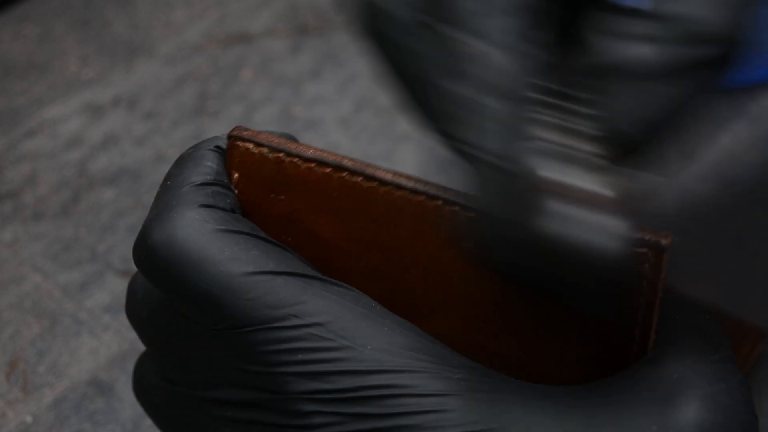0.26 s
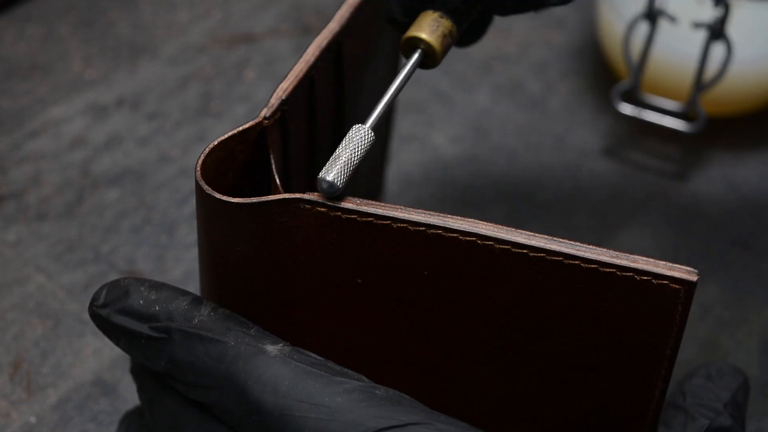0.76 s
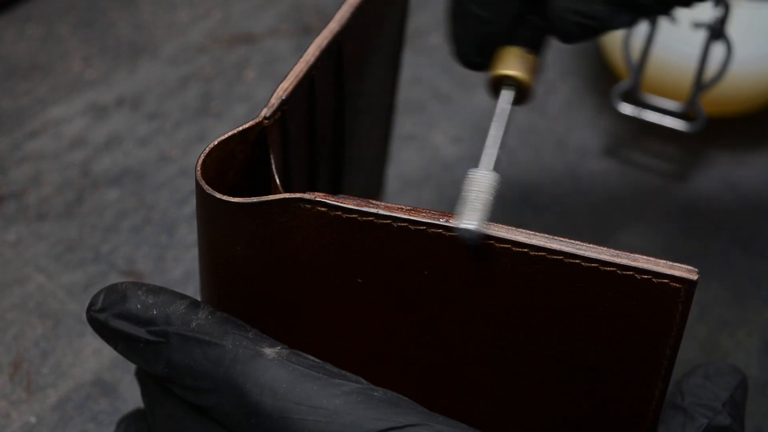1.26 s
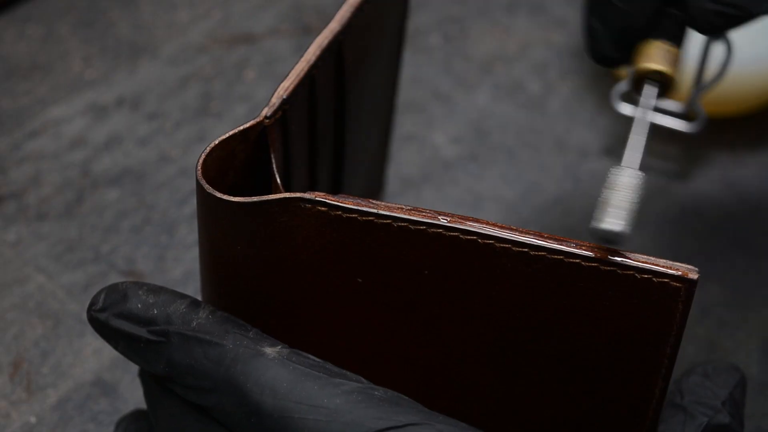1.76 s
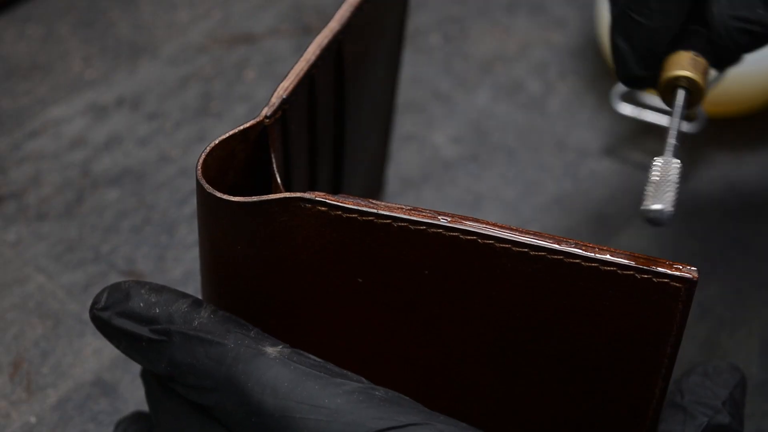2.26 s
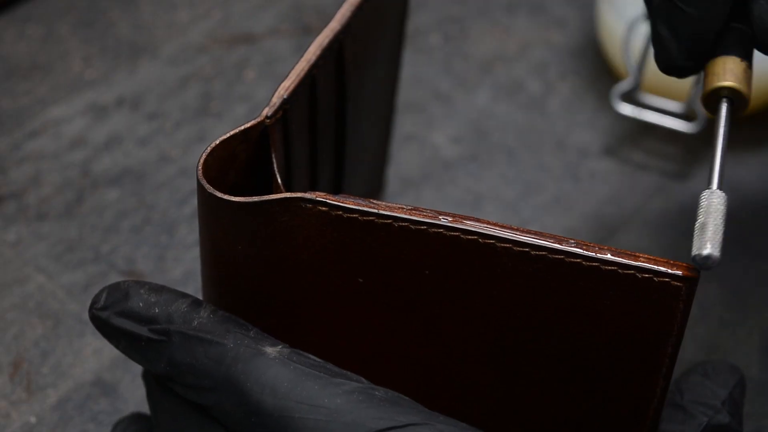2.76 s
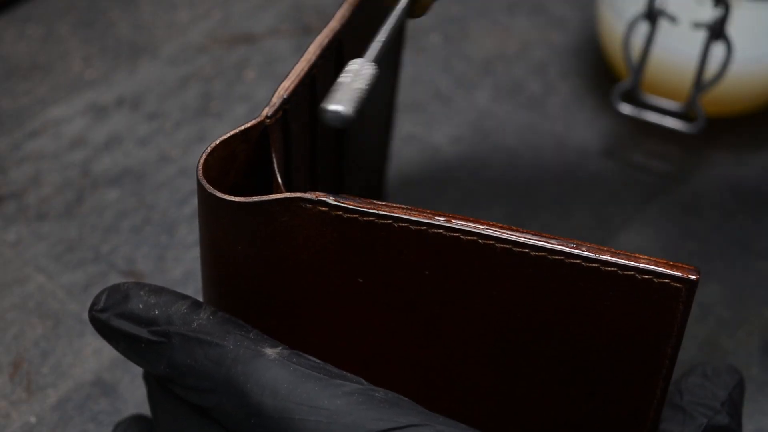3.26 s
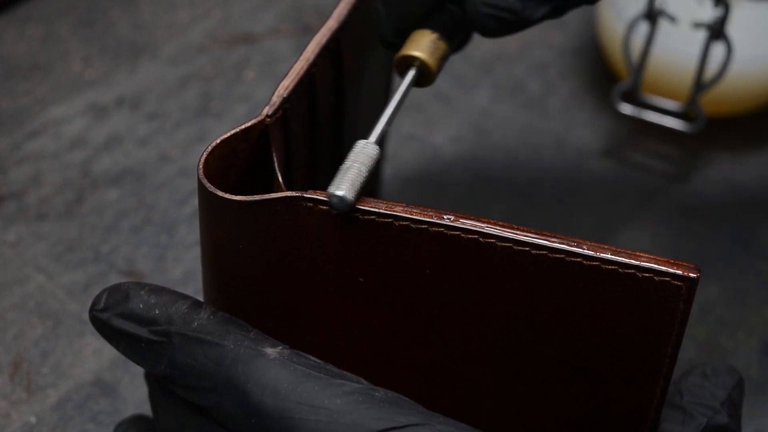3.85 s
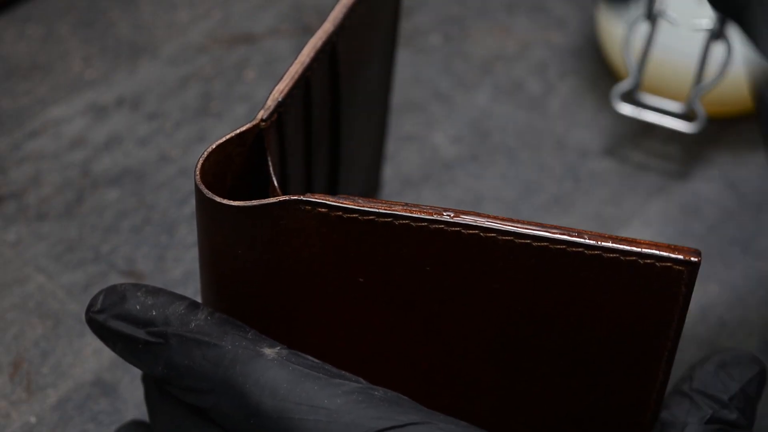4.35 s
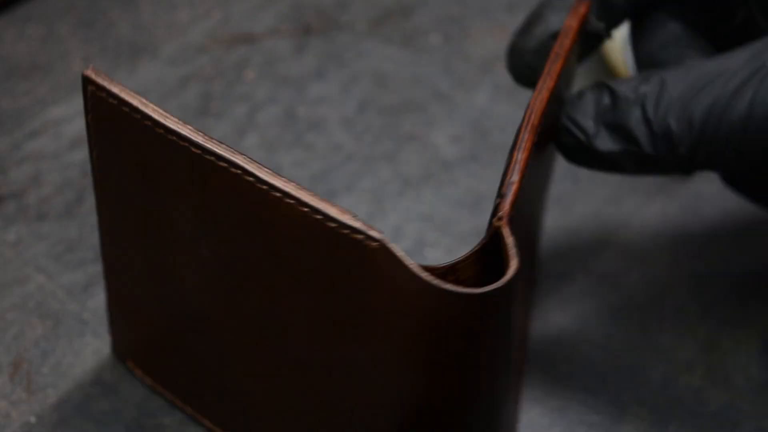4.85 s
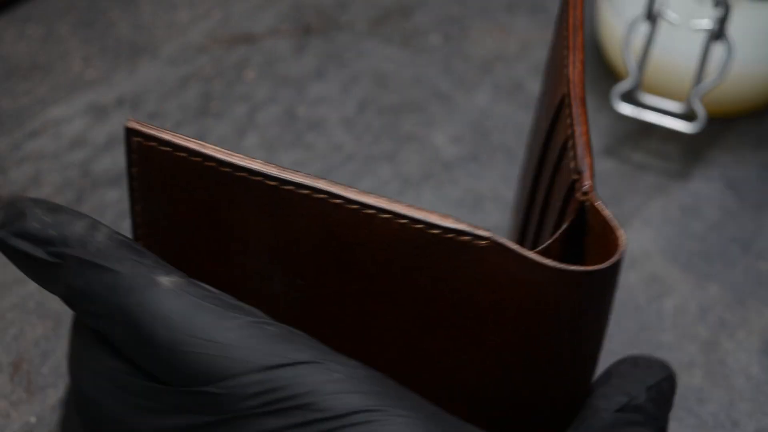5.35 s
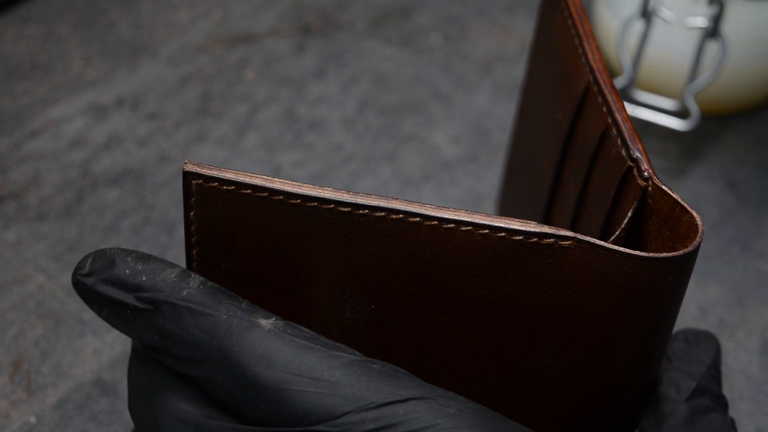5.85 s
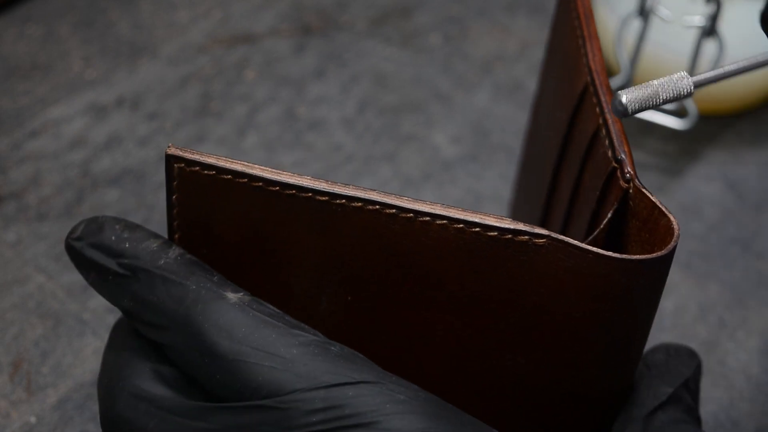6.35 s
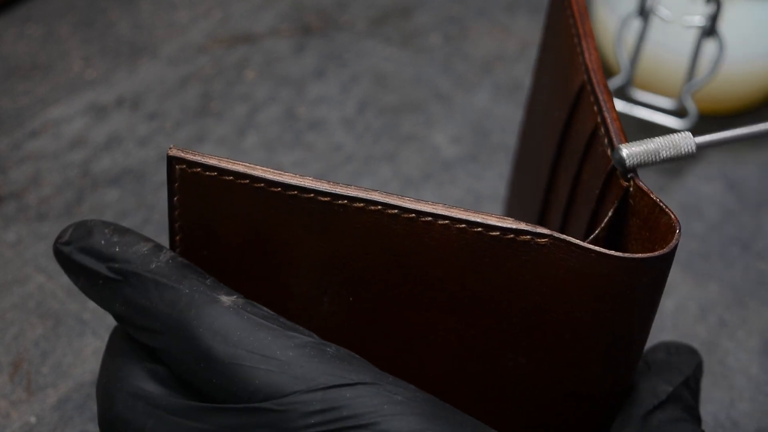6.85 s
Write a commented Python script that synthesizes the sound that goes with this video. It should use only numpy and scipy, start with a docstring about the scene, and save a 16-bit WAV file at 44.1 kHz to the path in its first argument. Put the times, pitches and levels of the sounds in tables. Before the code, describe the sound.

A close stereo microphone in a small, quiet workshop hears brisk scratchy burnishing with little chirping catches, then near silence. Irregular light dabs knock and tick on leather, some with a low soft boom from the bench. Gloves brush and crinkle as the wallet slides round. Two hard steel clicks ring briefly, a tenth of a second apart, before faint handling and low room noise.

```python
"""Finishing the edge of a leather wallet

Gloved hands work at a bench: a wooden burnisher scrubs to and fro, then a metal applicator dabs along the edge.
The wallet slides and bumps on the bench, and a steel tool clinks twice. Rubbing is random slips through resonances;
blows are bursts of scattered noise, and the bench booms in fading sine waves. Sound arrives mostly by reflection,
so left and right get separate noise."""
import sys
import numpy as np
from scipy import signal
from scipy.fft import rfft, irfft, next_fast_len
from scipy.io import wavfile

SR = 44100
rng = np.random.default_rng(int(sys.argv[2]) if len(sys.argv) > 2 else 0)


def master_out(mix):
    """Clip the mix to full scale and print it as 16-bit PCM to the path in sys.argv[1]."""
    frames = np.transpose(np.atleast_2d(mix))
    ceiling = np.clip(frames, -1, 1)
    pcm = np.round(ceiling * 32767).astype(np.int16)
    wavfile.write(sys.argv[1], SR, pcm)


N = 312669   # length of the scene in samples
BLOW_SIZE, LEAD_SIZE = 16384, 1024   # samples in one blow, and those ahead of its moment of contact
LIFT_OFF_S, LIFT_FADE_S = .732, .014   # the burnisher is at work from the start until it lifts off

# How strong the hiss of leather fibres is from low to high. Each row: frequency in Hz, level in dB per Hz.
FIBRES = [(300, -3.5), (1500, 0.5), (3200, 6), (5000, 2), (7000, 1), (9000, -1), (11500, -1.5),
          (13500, -8.5), (16000, -25)]


def from_db(db):
    """Turn decibels into a gain."""
    return 10 ** (np.asarray(db) / 20)


def rms_one(x):
    """Scale each channel to an average strength (rms) of 1."""
    return x / np.sqrt(np.mean(x ** 2, axis=-1, keepdims=True) + 1e-20)


def pan(db):
    """Gains that make the left louder than the right by this many dB."""
    return from_db(np.array([[db], [-db]]) / 2)


def colour(x, spectrum):
    """Give a sound a smooth balance of low and high, at rms 1."""
    hz, db = np.transpose(spectrum)
    size = next_fast_len(x.shape[-1])
    f = np.maximum(np.arange(size // 2 + 1) * SR / size, 1)
    gain = from_db(np.interp(np.log(f), np.log(hz), db))
    shaped = irfft(rfft(x, size) * gain, size)
    return rms_one(shaped[:, :x.shape[-1]])


def resonate(x, modes):
    """Pass a sound through resonances side by side, each at its own level."""
    out = 0
    for hz, width, db in modes:
        r = np.exp(-np.pi * abs(width) / SR)   # a narrow resonance rings longer
        feedback = [1, -2 * r * np.cos(2 * np.pi * hz / SR), r * r]
        out = out + from_db(db) * rms_one(signal.lfilter([1, 0, -1], feedback, x))
    return out


def ring(x, modes):
    """Clear resonances with dark valleys between them: each is passed twice."""
    return sum(resonate(resonate(x, [(hz, width, 0)]), [(hz, width, db)]) for hz, width, db in modes)


def tilt(modes, slope_db):
    """A harder contact favours the high resonances, by slope_db an octave around 7000 Hz."""
    return [(hz, width, db + slope_db * np.log2(hz / 7000)) for hz, width, db in modes]


def soften(x, hz):
    """A soft surface swallows the treble above hz."""
    low_pass = signal.butter(2, min(hz, SR / 2 - 1), fs=SR, output="sos")
    return signal.sosfilt(low_pass, x)


def waver(per_s, spread_db):
    """A gain that wanders at random, towards a new value per_s times a second."""
    steps = rng.standard_normal(4096)
    position = np.arange(N) / SR * per_s
    return from_db(spread_db * np.interp(position, np.arange(len(steps)), steps))


def shifting(x, modes, per_s, spread_db):
    """As the contact point moves, each resonance is driven now more, now less."""
    out = 0
    for hz, width, db in modes:
        driven = waver(per_s, spread_db) * resonate(x, [(hz, width, 0)])
        out = out + from_db(db) * rms_one(driven)
    return out


def friction(per_s, spread_db, smear_s):
    """Fibres snag and let go at random; each tiny slip is smeared by nearby reflections."""
    sizes = from_db(spread_db * np.minimum(rng.exponential(1, N), 4))
    slips = sizes ** 2 * (rng.random(N) < per_s / SR)
    power = signal.lfilter([1], [1, -np.exp(-1 / (smear_s * SR))], slips + 1e-12)
    return rms_one(np.sqrt(power) * rng.standard_normal((2, N)))


def envelope(start_s, length_s, attack_s, release_s):
    """A movement swells up to its start, holds, and dies away."""
    t = np.arange(N) / SR - start_s
    edges = np.minimum(t, 0) / abs(attack_s) - np.maximum(t - length_s, 0) / abs(release_s)
    return np.exp(np.maximum(edges, -20))


def scrubbing():
    """1 while the burnisher is on the edge, fading as it lifts off."""
    return envelope(0, LIFT_OFF_S, LIFT_FADE_S, LIFT_FADE_S)


def scatter(rise_s, t60, room_db):
    """One contact as a cloud of reflections: it swells, drops 60 dB in t60 seconds and leaves a room tail."""
    room_t60_s = 0.12
    t = (np.arange(BLOW_SIZE) - LEAD_SIZE) / SR
    after = np.maximum(t, 0)
    swell = np.exp(np.minimum(t, 0) / rise_s)
    decay = from_db(-60 * after / t60) + from_db(room_db - 60 * after / room_t60_s)
    return swell * decay * rng.standard_normal((2, BLOW_SIZE))


def boom(hz, bright_db, width, ring_cycles=22.0, rise_s=0.0025):
    """Each bench mode fades by 60 dB in ring_cycles cycles; standing waves set the two sides apart in phase."""
    # The modes of the bench's boom. Each row: multiple of the lowest pitch, level in dB before brightness.
    boom_modes = [(1, 0.5), (1.64, -5.5), (2.47, -14), (3.55, -20.5)]
    t = (np.arange(BLOW_SIZE) - LEAD_SIZE) / SR
    swell = np.exp(np.minimum(t, 0) / rise_s)
    out = 0
    for multiple, db in boom_modes:
        shape = swell * from_db(-60 * np.maximum(t, 0) * hz * multiple / ring_cycles)
        side_phase = np.array([[1], [-1]]) * width * np.pi / 2
        phase = 2 * np.pi * (hz * multiple * t + rng.random()) + side_phase
        level = from_db(db + bright_db * np.log2(multiple))   # a harder touch favours the higher modes
        out = out + level * rms_one(shape * np.sin(phase))
    return out


def add(out, s, blow):
    """Place a blow at time s; its level counts as if all its energy fell within 10 ms."""
    start = max(round(s * SR) - LEAD_SIZE, 0)
    part = out[:, start:start + BLOW_SIZE]
    part += blow[:, :part.shape[1]] * np.sqrt(.01 * SR / BLOW_SIZE)


def room_air():
    """Steady noise makes hiss and rumble; a wavering low resonance makes the room's drone."""
    # The balance of the room's noise. Each row: frequency in Hz, level in dB per Hz.
    air_spectrum = [(12, -32), (20, -1), (53, -7.5), (98, -6), (175, 0), (238, -4.5), (7950, -21),
                    (13100, -22), (15500, -23)]
    air = from_db(-56) * colour(rng.standard_normal((2, N)), air_spectrum)
    hum = ring(rng.standard_normal((2, N)), [(172, 76, -71)])
    drone = waver(per_s=4.4, spread_db=3.5) * hum
    return air * pan(db=1.06) + drone * pan(db=7.5)


def hands():
    """Working hands shake the bench with a lumpy rumble, more while they scrub or lean on it."""
    # A hand leans on the bench. Each row: start in seconds, length in seconds, rumble in dB.
    leans = [(1.36, 0.42, -62.5), (2.044, 0.11, -62), (2.368, 0.17, -61.5), (3.668, 0.11, -57.5),
             (4.09, .05, -60), (4.33, .06, -61), (6.67, .04, -62)]
    rest_db, scrub_db, lean_edge_s = -70, -62, 0.022
    resting = from_db(rest_db) * waver(per_s=7.6, spread_db=4.0)
    effort = np.hypot(resting, from_db(scrub_db) * scrubbing())
    for s, length_s, db in leans:
        effort = np.hypot(effort, from_db(db) * envelope(s, length_s, lean_edge_s, lean_edge_s))
    return effort * ring(rng.standard_normal((2, N)), [(46.6, 60, 0.5), (104.6, 70, -5)])


def burnisher(stroke_db=5.5):
    """Wood scrubs the edge to and fro: grainy rubbing, fibre hiss at top speed, and a catch now and then."""
    # The wood catches with a short chirp. Each row: start in seconds, level in dB, pitch in Hz.
    catches = [(0.101, -43.5, 1640), (0.143, -49, 1630), (0.253, -48.5, 1430), (0.283, -48.5, 1300),
               (0.29, -45.5, 1370), (0.34, -49.5, 1590), (0.4415, -43, 1690), (0.452, -49.5, 1360),
               (0.489, -52, 1650), (0.602, -50, 1600), (0.701, -47, 1610)]
    # Resonances of the rubbed wood. Each row: frequency in Hz, width in Hz, level in dB.
    wood_modes = [(920, 330, -8.5), (1350, 340, -9), (1690, 230, -4.5), (2250, 300, -13), (3050, 1400, -10)]
    stroke_s, mid_stroke_s = .0772, .054   # time of one stroke, and of the first top speed
    rub_db, rub_rise_db_per_s = -58.5, 7   # the hand bears down harder as it goes
    fibre_db, fibre_rise_db_per_s = -54.5, 5.0
    wallet_hum_db = -7.5   # against the rubbing

    t = np.arange(N) / SR
    contact = scrubbing()
    pressing_s = np.minimum(t, LIFT_OFF_S)
    rub = contact * from_db(rub_db + rub_rise_db_per_s * pressing_s)
    speed = np.cos(np.pi * (t - mid_stroke_s) / stroke_s) ** 2
    hiss_db = fibre_db + fibre_rise_db_per_s * pressing_s + stroke_db * (speed - 1)
    hiss = contact * from_db(hiss_db)
    slips = friction(per_s=1200, spread_db=3.0, smear_s=.0018)
    body = rub * shifting(slips, wood_modes, per_s=60, spread_db=6.5)
    for s, db, hz in catches:
        snag = scatter(rise_s=.0025, t60=.05, room_db=-14)
        add(body, s, from_db(db) * resonate(snag, [(hz, 260, 0), (1000, 900, -8)]))
    # The held wallet hums under the strokes.
    drone = rub * ring(rng.standard_normal((2, N)), [(148, 32, wallet_hum_db)])
    return soften(body, hz=3830) + hiss * colour(slips, FIBRES) + drone


def handling():
    """Slips give the dragged wallet a hollow rasp and the gloves a hiss; short noise bursts are the crinkles."""
    # The wallet slides under the gloves or over the bench.
    # Each row: start in seconds, length in seconds, attack in seconds, drag in dB, hiss in dB.
    slides = [(0.893, 0.063, .015, -61.5, -73), (1.244, 0.12, 0.027, -63, -76),
              (1.65, 0.028, 0.018, -59, -72), (3.467, 0.014, .01, -57, -70),
              (3.728, .015, .015, -61.5, -65), (4.671, .17, 0.031, -49.5, -56),
              (4.877, 0.088, .02, -58, -62), (5.254, 0.011, .004, -53.5, -65),
              (5.327, .18, 0.028, -60, -65), (5.987, .16, 0.034, -59, -61),
              (6.218, 0.08, 0.022, -62.5, -67)]
    # A glove brushes the leather. Each row: start in seconds, length in seconds, level in dB.
    brushes = [(0.507, 0.023, -57), (4.018, .02, -61), (4.178, .08, -63), (4.308, 0.048, -53),
               (4.945, 0.13, -55.5), (5.125, .025, -57), (5.199, 0.019, -54), (6.063, 0.079, -60)]
    # Short crinkles of gloves and leather. Each row: start in seconds, level in dB, pitch in Hz.
    crinkles = [(0.68, -48, 6940), (0.722, -44, 7500), (4.29, -49.5, 2800), (4.322, -48.5, 2590),
                (4.343, -53, 3300), (4.964, -46, 3320), (5.209, -65, 3500)]
    # Resonances of the sliding wallet. Each row: frequency in Hz, width in Hz, level in dB.
    slide_modes = [(504, 175, -4.5), (922, 260, -5.5), (1155, 270, -5), (1410, 170, -9), (1630, 150, -14),
                   (2130, 350, -30), (2870, 430, -38.5)]
    # The balance of the dragging leather's rasp. Each row: frequency in Hz, level in dB per Hz.
    rasp_spectrum = [(100, -0.5), (400, 5), (1200, 14), (2200, -14.5), (4000, -22), (8000, -24),
                     (16000, -36.5)]
    # The balance of a crinkle's noise. Each row: frequency in Hz, level in dB per Hz.
    crinkle_spectrum = [(400, -16), (1400, -5), (2800, 0), (5000, 2), (8000, -14), (12000, -2),
                        (16000, -22)]
    idle_drag_db, idle_hiss_db = -74, -72.5   # the grip never rests entirely
    slide_release_s, brush_attack_s, brush_release_s = 0.027, 0.021, 0.019

    grip = waver(per_s=9, spread_db=5.0)
    drag = from_db(idle_drag_db) * grip
    hiss = from_db(idle_hiss_db) * grip
    for s, length_s, attack_s, drag_db, hiss_db in slides:
        motion = envelope(s, length_s, attack_s, slide_release_s)
        drag = np.hypot(drag, from_db(drag_db) * motion)
        hiss = np.hypot(hiss, from_db(hiss_db) * motion)
    for s, length_s, db in brushes:
        hiss = np.hypot(hiss, from_db(db) * envelope(s, length_s, brush_attack_s, brush_release_s))

    slips = friction(per_s=1200, spread_db=0.0, smear_s=0.0041)
    hollow = soften(shifting(slips, slide_modes, per_s=28, spread_db=2.0), hz=3240)
    rasp_slips = friction(per_s=700, spread_db=4.5, smear_s=0.0027)
    rasp = from_db(-10) * colour(rasp_slips, rasp_spectrum)
    fibre_slips = friction(per_s=1500, spread_db=1.5, smear_s=0.0022)
    out = drag * (hollow + rasp) + hiss * colour(fibre_slips, FIBRES)
    for s, db, hz in crinkles:
        fold = scatter(rise_s=0.0088, t60=0.07, room_db=-27)
        rustle = from_db(-4) * colour(fold, crinkle_spectrum)
        add(out, s, from_db(db) * (rustle + resonate(fold, [(hz, 600, -7)])))
    return out


def bumps():
    """Soft pressure on the wallet, and the late knock of the second clink, wake little but the bench's lowest
    mode."""
    # The wallet bumps on the bench; the row at 5.885 s is the bench's knock after the second clink. Each row:
    # start in seconds, level in dB, pitch in Hz, stereo width 0-1.
    bump_list = [(.896, -45, 177, 0.9), (1.25, -46, 173, .95), (1.62, -52.5, 215, .2),
                 (1.685, -53.5, 262, .5), (1.92, -50, 189, 0.3), (2.18, -49.5, 213, .3),
                 (2.976, -48.5, 174, 0.34), (3.16, -54, 175, .2), (3.48, -51, 188, .2),
                 (4.685, -47, 186, .4), (4.821, -49.5, 187, 0.65), (5.885, -47.5, 326, .4),
                 (6.681, -55, 161, .4)]
    out = np.zeros((2, N))
    for s, db, hz, width in bump_list:
        add(out, s, from_db(db) * boom(hz, bright_db=-14, width=width))
    return out


def applicator():
    """Each dab knocks the leather, rings the thin shaft, ticks at the knurled tip and booms in the bench."""
    # The dabs. Each row: start in seconds, leather in dB, shaft ring in dB, tip tick in dB,
    # bench boom in dB, boom brightness in dB per octave.
    dabs = [(1.16, -60, -61, -69, -65, 0), (1.555, -69, -70, -62, -62, 0),
            (2.1255, -45.5, -43.5, -49, -55, 1), (2.235, -46, -62, -56, -58, 0),
            (2.367, -40.5, -45, -48.5, -52, 0), (2.516, -41.5, -44.5, -46.5, -44.5, -2),
            (2.678, -44, -48.5, -54, -50, -2), (2.86, -63, -44, -63, -45, -6.5),
            (3.231, -73, -64, -68, -70, -2), (3.388, -47, -47, -53, -62, -2),
            (3.814, -43, -65, -60, -45.5, 9)]
    # Resonances of the leather edge. Each row: frequency in Hz, width in Hz, level in dB.
    leather_modes = [(327, 310, -9.5), (495, 270, -8.5), (1044, 450, -3), (1387, 520, -6.5),
                     (1660, 810, -11.5), (2810, 790, -10)]
    # Resonances of the metal shaft. Each row: frequency in Hz, width in Hz, level in dB.
    shaft_modes = [(2170, 230, 0.5), (2885, 210, -17)]
    # Resonances of the metal tip. Each row: frequency in Hz, width in Hz, level in dB.
    tip_modes = [(5800, 650, -1.5), (6480, 490, -4), (6870, 480, -12.5), (10300, 1400, -11)]
    boom_hz = 174.4
    out = np.zeros((2, N))
    for s, leather_db, shaft_db, tip_db, boom_db, bright_db in dabs:
        touch = scatter(rise_s=0.0048, t60=0.02, room_db=-4.5)
        knock = from_db(leather_db) * ring(touch, leather_modes)
        tick = from_db(tip_db) * ring(touch, tip_modes)
        add(out, s, knock + tick)
        add(out, s - .002, from_db(shaft_db) * ring(touch, shaft_modes))   # rings from the first graze
        bench = from_db(boom_db) * boom(boom_hz, bright_db, width=0.38)
        add(out, s + 0.0029, bench * pan(db=3.5))
    return out


def clinks():
    """Steel rattles against something hard: a crack, short bright rings, a lower ring and a knock in the bench."""
    # Contacts of the steel tool, a few to each clink. Each row: start in seconds, level in dB,
    # brightness in dB per octave, low ring in dB, bench knock in dB, rise in seconds.
    contacts = [(5.7511, -16.5, 1, -43.5, -39.5, 0.0018), (5.755, -14, 3, -40, -47, 0.0036),
                (5.764, -21, -3, -44, -40.5, .003), (5.7703, -29.5, -2, -27.5, -51.5, .003),
                (5.8542, -23.5, 0.5, -50.5, -58, 0.0037), (5.8588, -13.5, 0.5, -49.5, -48.5, 0.003),
                (5.874, -28, -4.5, -48.5, -39, .004), (5.889, -46, -7, -59.5, -41, 0.0024)]
    # The tool's many short rings. Each row: frequency in Hz, width in Hz, level in dB before brightness.
    steel_modes = [(2404, 420, -16), (3424, 210, -19), (5380, 300, -11), (5790, 196, -16),
                   (5720, 330, -10.5), (6550, 389, -8), (8420, 280, -17.5), (10960, 210, -11.5),
                   (11600, 200, -14), (12460, 700, -16.5)]
    # The tool's two strongest rings, the upper one a close pair.
    # Each row: frequency in Hz, width in Hz, level in dB before brightness.
    main_modes = [(6805, 75, -3.5), (11190, 150, -4.5), (11330, 190, -6)]
    # The lowest, longest ring, from the glass jar the tool knocks against. Each row: frequency in Hz, width in
    # Hz, level in dB.
    low_modes = [(2246, 25, 0)]
    # Resonances of the knocked bench. Each row: frequency in Hz, width in Hz, level in dB.
    bench_modes = [(440, 45, -4), (505, 30, -2)]
    # The balance of the crack's noise. Each row: frequency in Hz, level in dB per Hz.
    crack_spectrum = [(200, -27), (500, -17), (1100, -12.5), (1900, -7), (4000, -4), (6000, -1), (8000, 0),
                      (9700, -6.5), (12300, -1.5), (13700, -15.5), (15800, -10)]
    out = np.zeros((2, N))
    for s, db, bright_db, ring_db, knock_db, rise_s in contacts:
        touch = scatter(rise_s=rise_s, t60=0.018, room_db=-18.5)
        main_rings = ring(touch, tilt(main_modes, bright_db)) * pan(db=2.0)
        steel = ring(touch, tilt(steel_modes, bright_db)) + main_rings
        crack_noise = scatter(rise_s=rise_s / 2, t60=0.03, room_db=-8.5)
        crack = from_db(-7.5) * colour(crack_noise, crack_spectrum)
        low_ring = from_db(ring_db) * resonate(touch, low_modes)
        knock = from_db(knock_db) * resonate(touch, bench_modes)
        add(out, s - .002, from_db(db) * steel)   # the rings build up from the first graze
        add(out, s, from_db(db) * crack + low_ring + knock)
    return out


def scene():
    """All sources together; the bumps and the rumble of the hands lean to the left."""
    low_sounds = (hands() + bumps()) * pan(db=3.5)
    return room_air() + low_sounds + burnisher() + handling() + applicator() + clinks()


def record(dry):
    """Peaks stop at full scale and the treble above the cutoff is cut."""
    cutoff_hz = 15850
    low_pass = signal.ellip(12, .1, 80, cutoff_hz, fs=SR, output="sos")
    return signal.sosfilt(low_pass, np.clip(dry, -1, 1))


dry = scene()
out = record(dry)
master_out(out)
```